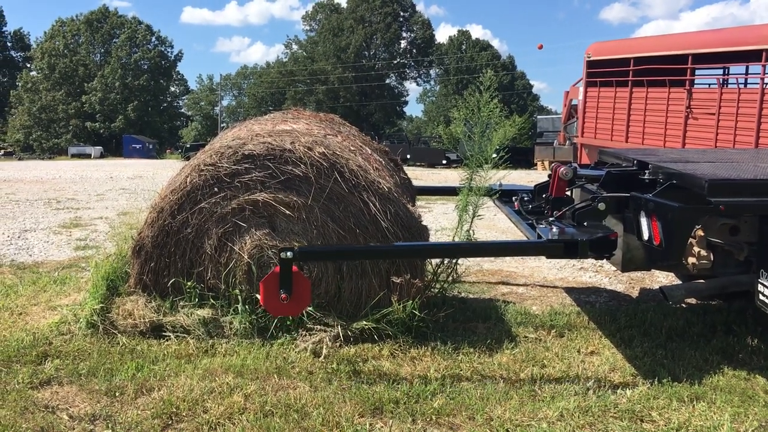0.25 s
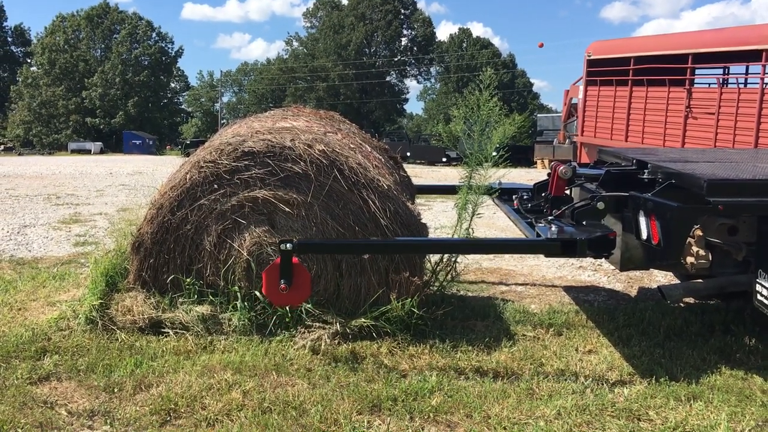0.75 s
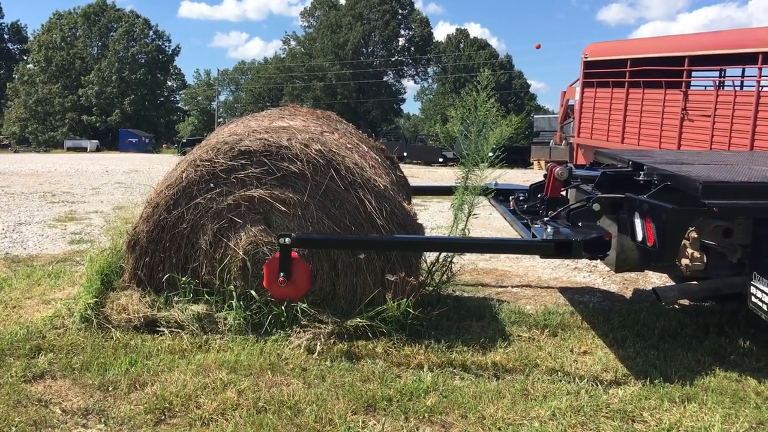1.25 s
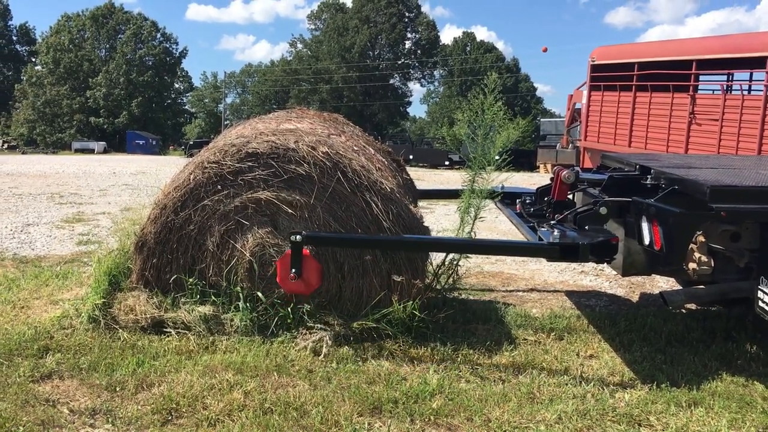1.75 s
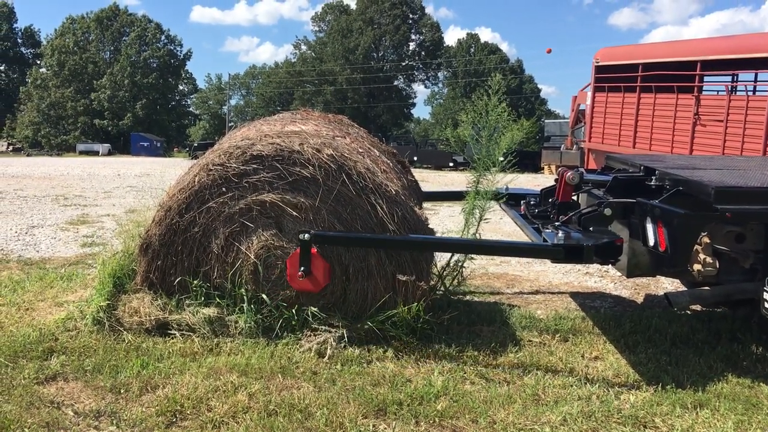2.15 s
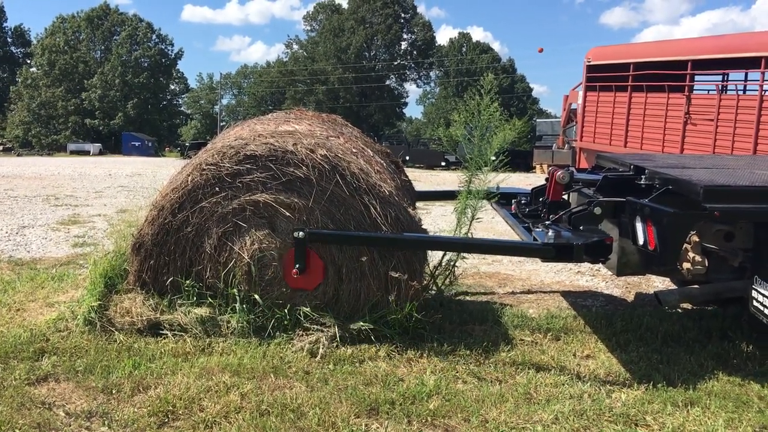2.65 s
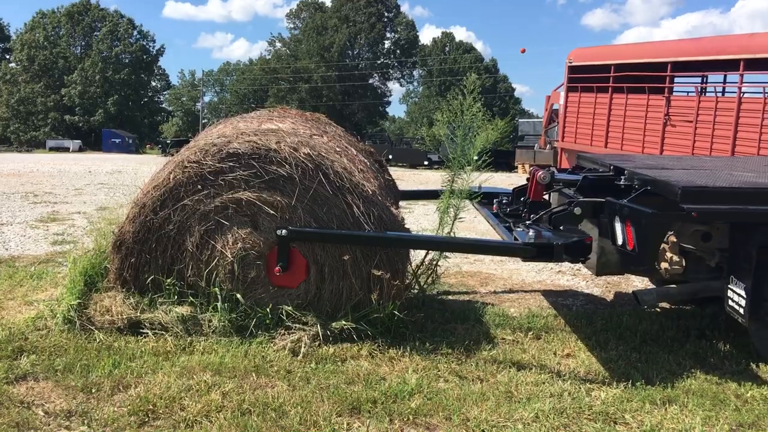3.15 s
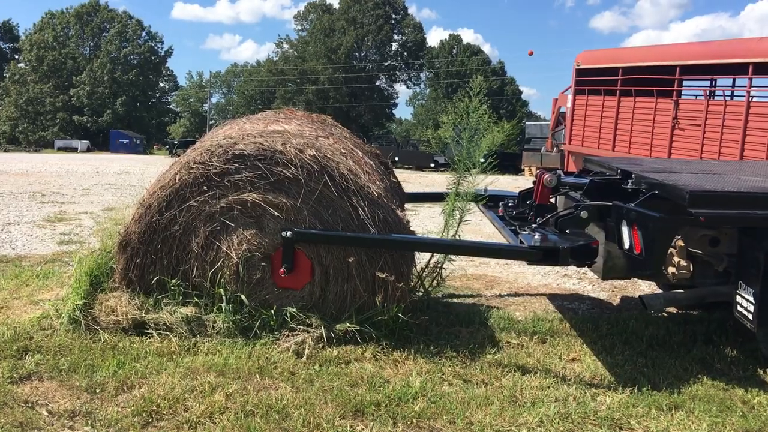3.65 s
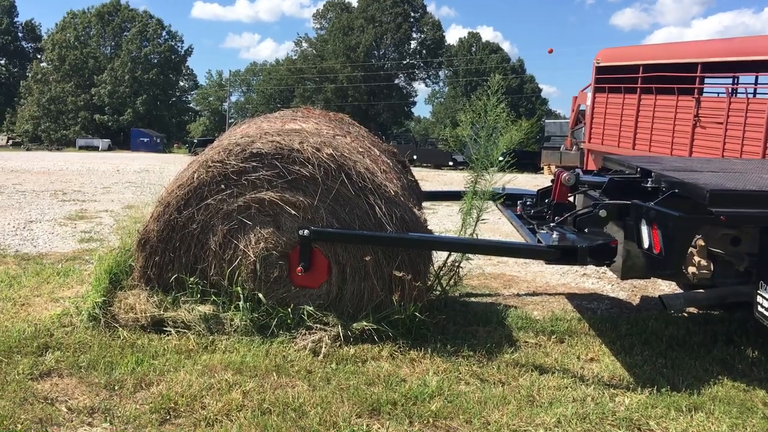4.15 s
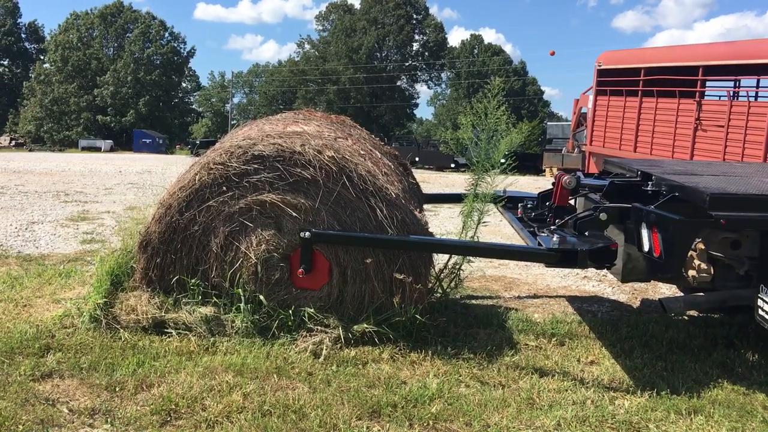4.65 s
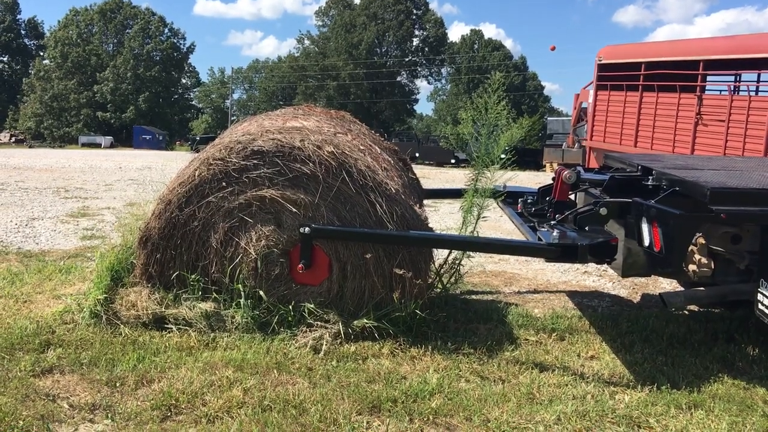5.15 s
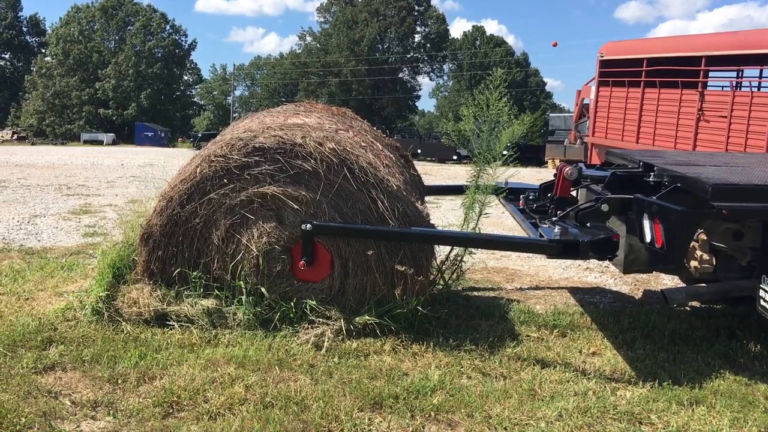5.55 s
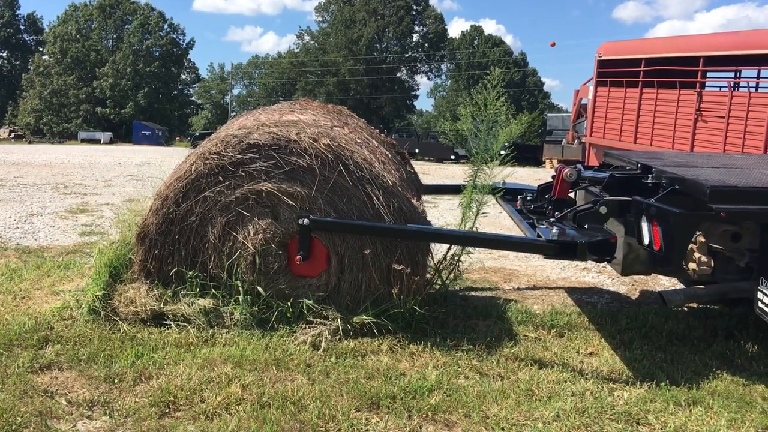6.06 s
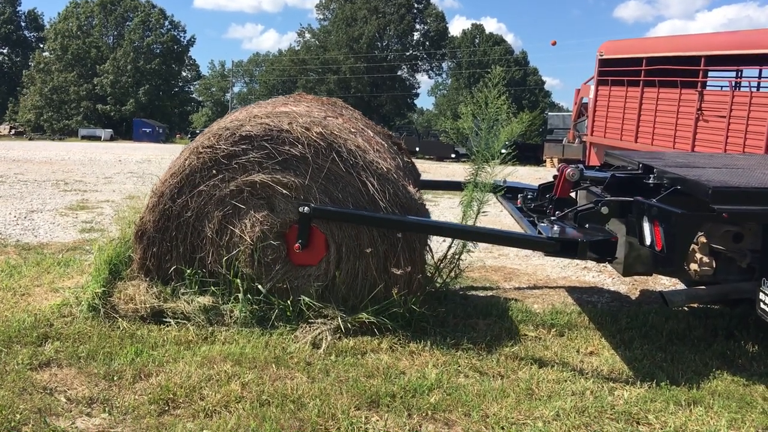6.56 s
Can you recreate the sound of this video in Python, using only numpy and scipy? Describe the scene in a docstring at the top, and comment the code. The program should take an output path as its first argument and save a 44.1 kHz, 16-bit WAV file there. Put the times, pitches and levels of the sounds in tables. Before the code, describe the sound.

An electric hydraulic pump whines steadily with a hiss of oil over a truck's low idling engine. A steel arm clunks, and the whine drops in pitch and grinds under strain while dry hay snaps and crackles. The pump stops with a brief valve spit, leaving the idle alone. Then it jolts back on and whines again, sinking a little in pitch. It all happens in open air with no echo.

```python
"""First you hear an electric gear pump whining over a truck's idling V8 engine, in the open air.
The pump drives oil to close the truck's arms on a hay bale; its gear teeth make the whine.
An arm clunks home, dry stems snap and the pump grinds to a stall. A valve spits, and later the
pump starts again to lift. Its current loads the alternator, so the engine idles lower while it runs."""
import sys
import numpy as np
from scipy import signal
from scipy.fft import rfft, irfft, next_fast_len
from scipy.io import wavfile
from scipy.ndimage import map_coordinates

SR = 44100
rng = np.random.default_rng(int(sys.argv[2]) if len(sys.argv) > 2 else 0)


def transcribe(signal):
    """Save signal, clipped to [-1, 1], as a 16-bit WAV file at the path in sys.argv[1]."""
    frames = np.atleast_2d(signal).T
    limited = np.clip(frames, -1, 1)
    pcm = np.round(limited * 32767).astype(np.int16)
    wavfile.write(sys.argv[1], SR, pcm)


N = 300321
T = np.arange(N) / SR
BINS = np.fft.rfftfreq(N, 1 / SR)

TEETH_PER_TURN = 9
CLAMP_HZ, LIFT_HZ = 564.2, 484.1  # pump speeds with no load, in gear teeth a second
CREEP_HZ = 170  # below this speed the gears fall quiet
CONTACT_S = 1.828  # the oil pressure starts to rise

# Levels in a table are relative to each other. A decay is the time taken to fade by 60 dB.
# engine speed, in four-stroke cycles: (time [s], cycle rate [Hz])
IDLE_SPEED = [(0, 5.17), (1.8, 5.2), (2.4, 5.33), (3.1, 5.4), (3.4, 5.54), (5.6, 5.54), (5.85, 5.2),
              (6.81, 5.1)]
# exhaust tones: (multiple of the cycle rate, loaded level [dB], unloaded level [dB])
EXHAUST_TONES = [(11, -44.5, -41), (13, -57, -37), (14, -62, -37.5), (15, -42, -34.5), (16, -30, -32.5),
                 (17, -59, -47), (18, -54, -60), (22, -82, -38), (23, -52, -69), (24, -39, -46),
                 (30, -45, -68), (31, -42, -46), (32, -45.5, -49.5), (35, -46, -46.5)]
# low rumble of the engine: (frequency [Hz], level [dB])
RUMBLE_SPECTRUM = [(20, -68), (32, -8), (42, -1.5), (60, -1), (85, 2.5), (103, 0.5), (125, 3.5),
                   (150, -6.5), (190, -8), (240, -8), (285, -17), (335, -8), (420, -25), (600, -56.5)]
# rush of the cooling fan: (frequency [Hz], level [dB])
FAN_SPECTRUM = [(240, -60), (400, -6), (600, -10.5), (900, -10.5), (1300, -13.5), (2000, -17),
                (2850, -27.5), (3800, -18.5), (4950, -27), (6700, -27), (8300, -34), (9400, -33.5),
                (10300, -53), (16000, -65)]
# sharp snaps of dry stems, and two valve clicks as the pump stops: (time [s], level [dB], decay [s])
SNAPS_AND_CLICKS = [(2.455, -37, .005), (2.567, -29, .0047), (2.712, -33, .011), (2.949, -14.5, .0012),
                    (3.085, -40, .04), (3.096, -37, .016), (3.5345, -36, .0032), (3.772, -46, .01),
                    (4.278, -44, .005), (6.575, -37, .006)]
# brightness of a snap or click: (frequency [Hz], level [dB])
SNAP_SPECTRUM = [(1500, -15), (3500, -6), (7000, 0), (10000, -1), (16000, -3)]
# the valve shutting and opening: (time [s], level [dB], decay [s])
VALVE_SPITS = [(3.142, -41, 0.068), (5.611, -35.5, 0.033), (5.615, -38.5, .035), (5.625, -37.5, 0.065)]
# hiss of a spit: (frequency [Hz], level [dB])
SPIT_SPECTRUM = [(1000, -9), (2700, -8.5), (3500, 15.5), (5500, 0), (8000, 5), (12000, 1), (16000, -20)]
# the arm knocking and rattling: (time [s], level [dB], decay [s])
ARM_KNOCKS = [(1.808, -21.5, 0.083), (1.816, -25.5, 0.079), (1.824, -35, 0.082), (1.845, -34.5, 0.4),
              (1.922, -36.5, 0.061), (1.938, -34, 0.16)]
# tone of a knock: (frequency [Hz], level [dB])
KNOCK_SPECTRUM = [(100, -1), (180, 9), (330, -26), (520, 16.5), (750, 8.5), (1400, 9.5), (2500, 1.5),
                  (4000, -4.5), (6000, -8), (7500, -24), (16000, -36)]
# ringing notes of the steel truck bed: (frequency [Hz], level [dB], decay [s])
BED_MODES = [(184.4, 1.5, 0.22), (225, -1, 0.33), (271.6, -1, 0.27), (504, -4.5, 0.28), (684, 3.5, 0.013),
             (1520, -17, 0.073), (2340, -19, 0.032)]
# the pump clamps, then lifts:
# (on [s], off [s], free speed [teeth/s], whine [dB], grinding [dB], oil hiss [dB])
CLAMP_AND_LIFT = [(-.5, 3.05, CLAMP_HZ, -43.5, -55, -47), (5.608, 7, LIFT_HZ, -41, -59.5, -47.5)]
# the arms touch, squeeze and lift the bale: (time [s], speed lost [teeth/s], build-up [s])
BALE_LOADS = [(1.797, 31.6, .248), (2.257, 315.2, .558), (5.649, 132, .631)]
# oil rushing through the valve: (frequency [Hz], level [dB])
OIL_SPECTRUM = [(2500, -15.5), (3600, 10.5), (5500, 0.5), (8500, 10.5), (10500, -1.5), (13000, 2.5),
                (16000, -30)]
# gears grinding: (frequency [Hz], level [dB])
GRIND_SPECTRUM = [(350, -9), (600, 5), (900, 3.5), (1300, 6.5), (2000, 7), (2750, -4), (3600, -6),
                  (4700, -9), (5600, -5.5), (6500, -21.5), (8500, -35), (10500, -19), (16000, -23)]
# ringing notes of the motor mount: (frequency [Hz], level [dB], decay [s])
MOUNT_MODES = [(613, 7, 0.081), (777, 2.5, 0.12), (844, 1.5, 0.18), (910, 5.5, 0.11)]
# squeal at one critical speed: (multiple of the tooth rate, frequency [Hz], width [Hz], level [dB])
SQUEAL_TONES = [(6, 2020, 184, -30.5)]
# tones of an off-centre gear: (multiple of the shaft rate, level [dB])
SHAFT_TONES = [(10, -59.5), (26, -61), (28, -70), (33, -64.5), (34, -56), (35, -69), (38, -63), (56, -63),
               (67, -69), (113, -57)]
# how well the pump housing gives off sound: (frequency [Hz], level [dB])
HOUSING_SPECTRUM = [(350, 8), (520, 3), (900, 4), (1250, 2.5), (1700, -5), (2150, 2.5), (2750, -22),
                    (3600, -10), (4700, -17), (5700, -11.5), (6600, -24), (8600, -6.5), (10500, -35.5),
                    (15500, -30)]
# its narrow peaks and dips: (frequency [Hz], width [Hz], level [dB])
HOUSING_RESONANCES = [(357, 12, 10), (890, 110, 3), (1430, 50, 4), (1635, 60, 10), (1770, 80, 6),
                      (1870, 60, 4), (2145, 60, -13), (2228, 30, 9), (3330, 70, 5), (3420, 60, -9),
                      (3560, 110, 7), (3750, 150, 9), (4130, 110, 4), (5480, 160, 3), (7110, 110, 16.5),
                      (7980, 130, 5)]
# tones of the whine: (multiple of the tooth rate, free level [dB], level under pressure [dB])
TOOTH_HARMONICS = [(1, -3.3, -7), (2, -6, -7.5), (3, -9, 7), (4, -1.5, 3.5), (5, -5, -4.5), (6, 6.5, 4),
                   (7, 1, 0), (8, 1.3, 3.5), (9, -4.5, 6), (10, -21, 0), (11, -30, 5.5), (12, 10, 1),
                   (13, 5.5, 3.5), (14, 7.5, -0.5), (15, -1.5, -4), (16, 1, -5), (17, -2, 1), (18, 16, 2)]
# the third harmonic comes and goes while the pump runs free: (time [s], level [dB])
THIRD_HARMONIC = [(.22, -10), (.32, 4.5), (1.0, 0.5), (1.12, -2), (1.45, 0), (1.8, -9)]


def from_db(db):
    """Turn decibels into a gain."""
    return 10 ** (np.asarray(db) / 20)


def rms_one(x):
    """Scale a signal to an average power of 1."""
    return x / np.sqrt(np.mean(x ** 2) + 1e-20)


def in_time(points):
    """Read a curve at every sample."""
    return np.interp(T, *np.transpose(points))


def at_hz(points, hz):
    """Read a spectrum in dB along a logarithmic frequency axis."""
    f, db = np.transpose(points)
    return np.interp(np.log(hz + 1e-3), np.log(f), db)


def fade(since_s, length_s):
    """Stay at 1 until the given time, then fall along a bell curve."""
    return np.exp(-(np.maximum(T - since_s, 0) / length_s) ** 2)


def drift(rate_hz):
    """A smooth random wobble, about 1 in size."""
    knots = rng.standard_normal(400)
    return map_coordinates(knots, [T[::64] * rate_hz], order=3, mode="wrap").repeat(64)[:N]


def colour(x, db):
    """Filter a sound by a dB curve scaled to a power gain of 1."""
    cepstrum = irfft(np.log(rms_one(from_db(db))), N)
    cepstrum[1:N // 2] *= 2
    cepstrum[N // 2:] = 0  # ringing comes after a hit, never before
    return irfft(rfft(x) * np.exp(rfft(cepstrum)), N)


def noise(spectrum):
    """Steady noise with the given spectrum and a power of 1."""
    size = next_fast_len(N)
    gain = from_db(at_hz(spectrum, np.fft.rfftfreq(size, 1 / SR)))
    white = rng.standard_normal(size)
    return rms_one(irfft(rfft(white) * gain, size)[:N])


def bursts(events):
    """Each event is a burst of noise that dies away."""
    envelope = np.zeros(N)
    for start_s, db, decay_s in events:
        start = int(start_s * SR)
        age = T[:min(SR // 2, N - start)]
        envelope[start:start + len(age)] += from_db(db - 60 * age / decay_s)
    return envelope * rng.standard_normal(N)


def ring(hits, modes):
    """Struck metal rings at its own fading notes, called modes."""
    out = np.zeros(N)
    for hz, db, decay_s in modes:
        radius, angle = from_db(-60 / (decay_s * SR)), 2 * np.pi * hz / SR
        gain = from_db(db) * np.sin(angle) * np.sqrt(2 * (1 - radius ** 2))
        out += signal.lfilter([0, gain], [1, -2 * radius * np.cos(angle), radius ** 2], hits + 1e-18)
    return out


def engine(unloaded_hz=5.67, full_sag_hz=0.64, rumble_db=-34.5, fan_db=-50.5):
    """The exhaust booms at twice the firing rate; uneven cylinders add tones that beat once a cycle."""
    idle_hz = in_time(IDLE_SPEED)
    cycles = np.cumsum(idle_hz) / SR - .05
    load = np.clip((unloaded_hz - idle_hz) / full_sag_hz, 0, 1)
    exhaust = np.zeros(N)
    for k, loaded_db, free_db in EXHAUST_TONES:
        offset = 0.2603 * (k - 16) * rng.standard_normal()  # phases scatter more far from the boom
        gain = from_db(free_db + load * (loaded_db - free_db) + drift(5.4))
        exhaust += np.sqrt(2) * gain * np.cos(2 * np.pi * k * cycles + offset + 0.3 * drift(5))
    throb = 1 + 0.12 * np.cos(2 * np.pi * cycles)
    firing = 1 + 0.093 * np.cos(2 * np.pi * 8 * cycles)  # eight cylinders
    rumble = from_db(rumble_db) * throb * noise(RUMBLE_SPECTRUM)
    fan = from_db(fan_db) * firing * noise(FAN_SPECTRUM)
    return exhaust + rumble + fan


def hay_and_clicks(squeeze_s=2.7, crackles_per_s=70, crackle_db=-37, ticks_per_s=4, tick_db=-52):
    """Squeezed hay snaps and crackles, then ticks as it settles; the valve clicks as the pump stops."""
    squeeze = np.exp(-((T - squeeze_s) / 0.27) ** 2)
    crackle = from_db(crackle_db) * (rng.random(N) < crackles_per_s * squeeze / SR)
    ticks = from_db(tick_db) * (rng.random(N) < ticks_per_s / SR) * (T > squeeze_s)
    hits = bursts(SNAPS_AND_CLICKS) + (crackle + ticks) * rng.laplace(size=N)
    return colour(hits, at_hz(SNAP_SPECTRUM, BINS))


def valve():
    """Oil spits briefly as the valve shuts and opens."""
    return colour(bursts(VALVE_SPITS), at_hz(SPIT_SPECTRUM, BINS))


def arm(ring_db=-7.5):
    """Steel rattles against steel and sets the truck bed ringing."""
    knocks = bursts(ARM_KNOCKS)
    return colour(knocks, at_hz(KNOCK_SPECTRUM, BINS)) + from_db(ring_db) * ring(knocks, BED_MODES)


def motor(spin_up_s=.061, coast_s=.15, inrush_s=0.12):
    """The motor starts with a rush of current, is slowed by each load and coasts to rest."""
    speed, inrush, levels_db = np.zeros(N), np.zeros(N), np.zeros((3, N))
    for on_s, off_s, free_hz, *run_db in CLAMP_AND_LIFT:
        started = T >= on_s
        spin_up = 1 - np.exp(-np.maximum(T - on_s, 0) / spin_up_s)
        lost_hz = sum(hz * (1 - fade(s, build_s)) for s, hz, build_s in BALE_LOADS if on_s < s < off_s)
        speed += spin_up * (free_hz - lost_hz) * fade(off_s, coast_s)  # teeth a second
        inrush += started * fade(on_s, inrush_s)
        levels_db[:, started] = np.array(run_db)[:, None]
    return speed, inrush, levels_db


def mount_jolt(time_s=5.655, hz=715, db=-27, rise_s=.008, decay_s=.09):
    """The twist of the restarting motor jolts its mount, which rings briefly."""
    age = T - time_s
    rise = np.clip(1 + age / rise_s, 0, 1)
    decay = from_db(db - 60 * np.maximum(age, 0) / decay_s)
    return rise * decay * np.sin(2 * np.pi * hz * age)


def off_centre_gear(teeth, seating_s=0.26):
    """A slightly off-centre gear adds faint tones until pressure seats it."""
    loose = np.clip(1 + (CONTACT_S - T) / seating_s, 0, 1)
    turns = teeth / TEETH_PER_TURN
    tones = sum(from_db(db) * np.cos(2 * np.pi * (k * turns + rng.random())) for k, db in SHAFT_TONES)
    return np.sqrt(2) * loose * tones


def squeal(speed, teeth):
    """The sixth harmonic squeals as the pump passes about 337 teeth a second."""
    out = np.zeros(N)
    for k, hz, width, db in SQUEAL_TONES:
        nearness = 1 / (1 + (2 * (k * speed - hz) / width) ** 4)
        out += from_db(db) * nearness * np.cos(2 * np.pi * k * teeth)
    return np.sqrt(2) * out


def chatter(speed, teeth, inrush, stall_db=-38, start_db=-31, peak_hz=194, width_hz=123):
    """Near a stall and on starting, slack gears knock once a turn and rattle the mount."""
    knocks = np.exp(-2.5 * (teeth / TEETH_PER_TURN % 1)) * rng.standard_normal(N)
    rattle = ring(knocks, MOUNT_MODES)
    near_stall = np.exp(-((speed - peak_hz) / width_hz) ** 2) * (1 - inrush)
    starting = inrush * (speed / speed.max()) ** 2
    gain = from_db(stall_db) * near_stall + from_db(start_db) * starting
    return gain * rattle / rattle[speed > CREEP_HZ].std()


def uneven_teeth(teeth, spread_db=2.0, size=4096, count=330):
    """No two teeth are alike: a pattern repeats each turn, adding tones between the tooth harmonics."""
    multiples = np.arange(count)
    strengths = from_db(spread_db * np.minimum(rng.standard_normal(count), 1.5))
    tones = strengths * np.exp(2j * np.pi * rng.random(count))
    tones[(multiples % TEETH_PER_TURN == 0) | (multiples < TEETH_PER_TURN)] = 0
    one_turn = irfft(tones, size)
    return np.interp(teeth / TEETH_PER_TURN % 1 * size, np.arange(size), one_turn)


def oil_hiss(teeth, repeat_share=.7):
    """Oil hisses through the valve; most of the hiss repeats on every turn, so it sizzles."""
    sizzle = colour(uneven_teeth(teeth), at_hz(OIL_SPECTRUM, BINS))
    running = np.gradient(teeth) * SR > CREEP_HZ
    sizzle /= sizzle[running].std()
    return np.sqrt(repeat_share) * sizzle + np.sqrt(1 - repeat_share) * noise(OIL_SPECTRUM)


def housing_db():
    """The pump housing gives off some frequencies more strongly than others."""
    peaks = sum(db / (1 + (2 * (BINS - hz) / width) ** 2) for hz, width, db in HOUSING_RESONANCES)
    return at_hz(HOUSING_SPECTRUM, BINS) + peaks


def tooth_buzz(teeth, db_per_octave=2.0):
    """The uneven teeth buzz through the housing, with the treble lifted."""
    treble_db = db_per_octave * np.log2(np.maximum(BINS, 2000))
    return rms_one(colour(uneven_teeth(teeth), housing_db() + treble_db))


def whine(speed, teeth, pressure, flutter_db=3.03, swell_db=2.37, harmonics=36):
    """Meshing teeth make tones that slide through the housing's peaks and waver more under pressure."""
    housing = housing_db()
    unrest = 0.36 + 0.64 * pressure
    out = np.zeros(N)
    for k in range(1, harmonics + 1):
        _, free_db, pressed_db = TOOTH_HARMONICS[k - 1] if k <= len(TOOTH_HARMONICS) else (k, 0, 0)
        db = np.interp(k * speed, BINS, housing)
        db += free_db + pressure * (pressed_db - free_db)  # pressure reshapes each tooth's pulse
        db += unrest * (flutter_db * drift(58) + swell_db * drift(14))
        if k == 3:
            db += in_time(THIRD_HARMONIC)
        jitter = 0.033 * np.sqrt(k) * pressure * drift(58)
        out += from_db(db) * np.cos(2 * np.pi * (k * teeth + jitter + rng.random()))
    return np.sqrt(2) * out


def pump(pressure_rise_s=.21, start_grind_db=-51):
    """As the motor labours and slows, the whine and oil hiss sink while the grinding grows."""
    speed, inrush, (whine_db, grind_db, hiss_db) = motor()
    labour = 1 - speed / speed.max()  # 0 at top speed, 1 at rest
    pressure = np.clip((T - CONTACT_S) / pressure_rise_s, 0, 1)
    wobble = (.0002 + .007 * labour) * drift(55)  # a slowed motor turns less evenly
    teeth = np.cumsum(speed * (1 + wobble)) / SR  # how many teeth have passed

    buzz = from_db(-8 + 10 * labour + 3 * pressure) * tooth_buzz(teeth)
    tone_gain = from_db(whine_db - 24.5 * labour - 1.5 * pressure)
    tones = tone_gain * (whine(speed, teeth, pressure) + buzz)
    grind_gain = from_db(grind_db + 4.5 * labour + 6.5 * pressure)
    grind_gain += from_db(start_grind_db) * inrush  # the starting current shakes the gears
    grind = grind_gain * noise(GRIND_SPECTRUM)
    hiss = from_db(hiss_db - 59 * labour ** 2) * oil_hiss(teeth)  # fades as the flow dwindles

    puffs = 1 + 0.3 * np.cos(2 * np.pi * teeth)  # one puff of noise for each tooth
    binding = 1 + 0.42 * labour * np.cos(2 * np.pi * teeth / TEETH_PER_TURN)  # gears rub once a turn
    gears = binding * (tones + puffs * (grind + hiss) + squeal(speed, teeth))
    turning = np.minimum(speed / CREEP_HZ, 1) ** 2
    return turning * (gears + chatter(speed, teeth, inrush)) + off_centre_gear(teeth) + mount_jolt()


def scene():
    """Everything sounds from the truck, with no walls near to echo."""
    return (pump() + engine() + arm() + hay_and_clicks() + valve())[None]


def record(dry, cutoff_hz=15900):
    """Cut off the highest treble steeply."""
    return signal.sosfilt(signal.ellip(12, .1, 90, cutoff_hz, fs=SR, output="sos"), dry)


dry = scene()
out = record(dry)
transcribe(out)
```